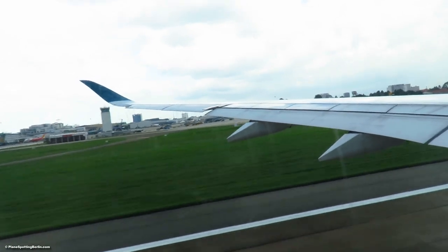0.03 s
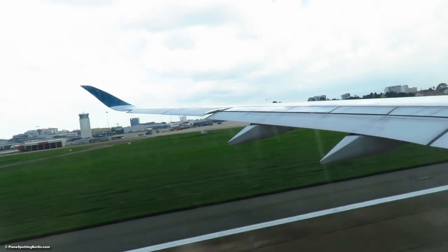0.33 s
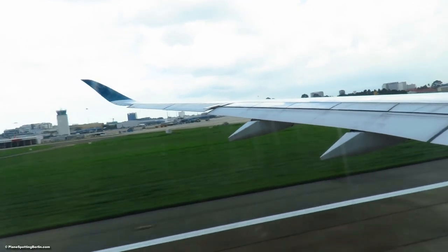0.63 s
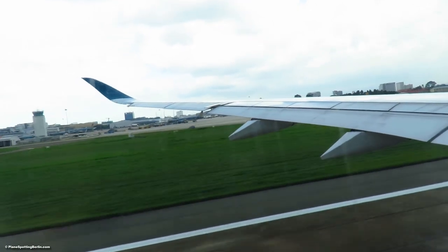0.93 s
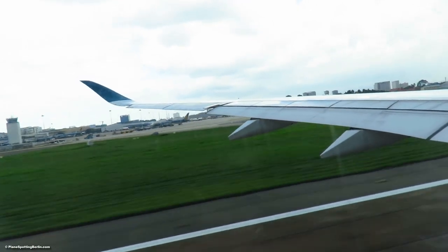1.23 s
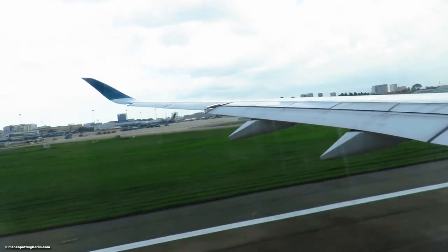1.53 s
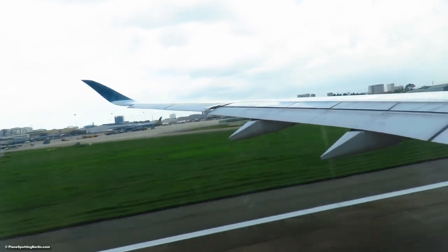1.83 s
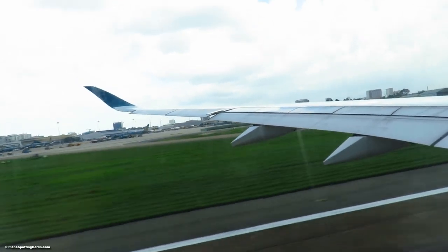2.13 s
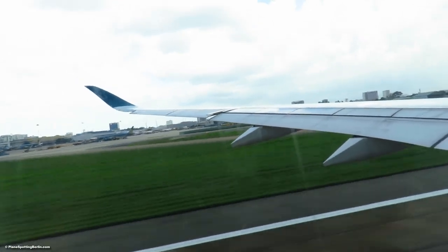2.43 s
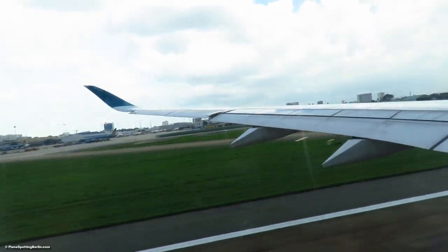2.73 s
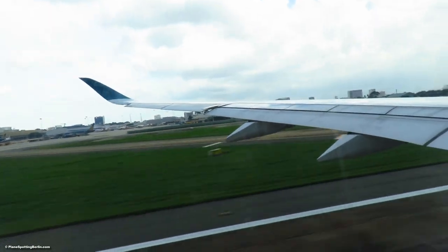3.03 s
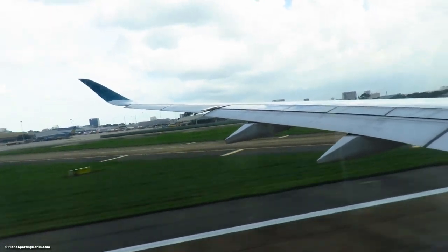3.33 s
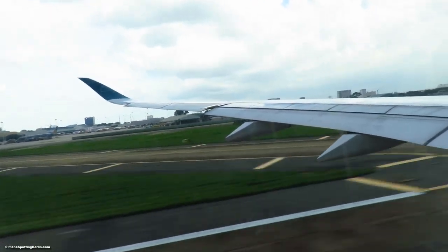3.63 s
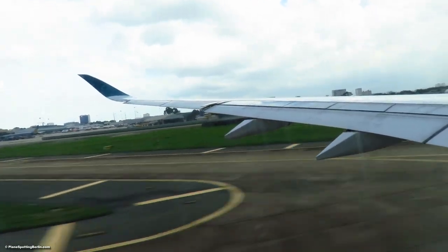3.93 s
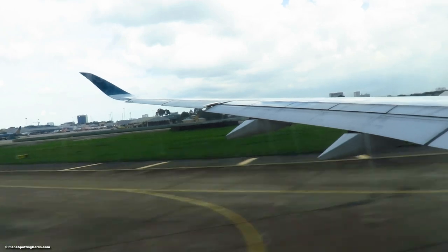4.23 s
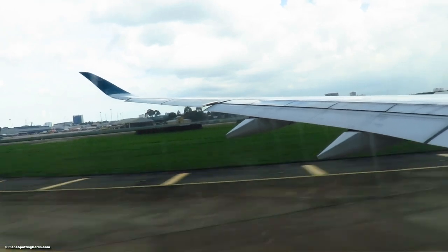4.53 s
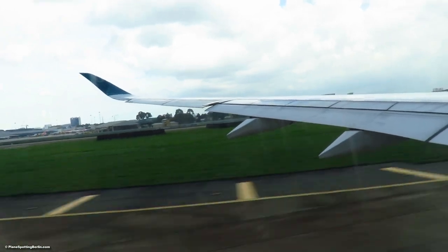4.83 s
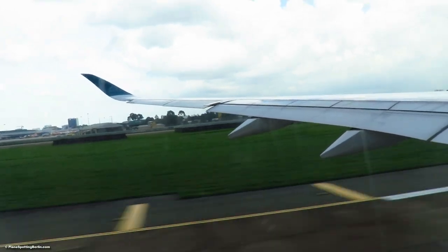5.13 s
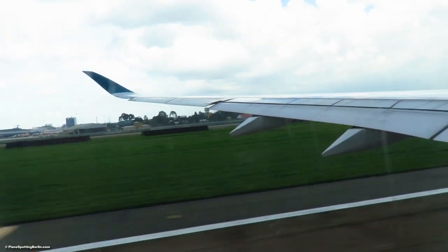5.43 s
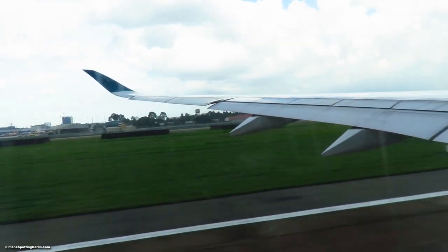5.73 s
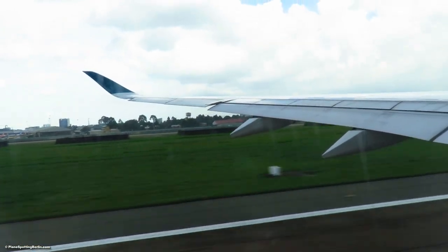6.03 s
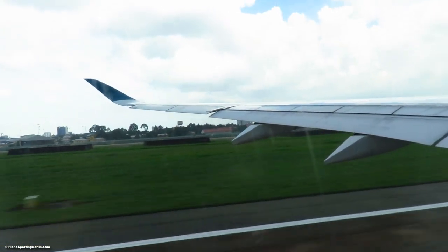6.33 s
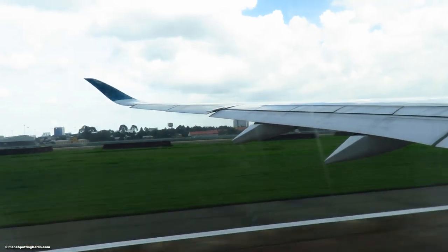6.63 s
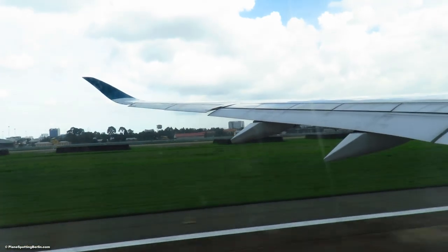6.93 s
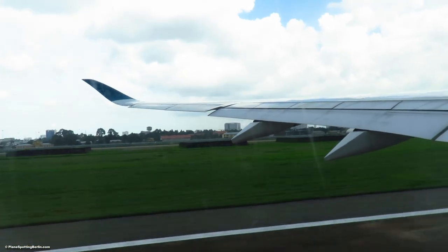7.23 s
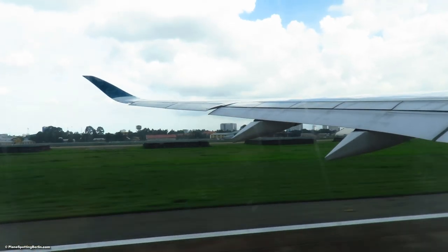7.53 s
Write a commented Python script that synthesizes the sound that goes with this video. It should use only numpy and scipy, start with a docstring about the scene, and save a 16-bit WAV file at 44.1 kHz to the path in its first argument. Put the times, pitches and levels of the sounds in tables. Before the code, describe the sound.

An airliner rolls fast along a runway, heard from inside the cabin by the wing. From start to finish, a deep wheel rumble and a muffled engine roar dominate at a steady level and pitch. A low cabin boom throbs within them, joined by a softer rush of air, faint fan tones and a very faint high fizz. Pavement bumps swell the rumble into dull thuds around 1.8, 2.3 and 3.3 seconds, more strongly at 4 and 4.8, then again at 5.6, 6.5 and 7.5. Faint tyre grinding rises slightly between 3.9 and 4.8 seconds. Interior trim chatters quietly throughout, with brief plastic rattles at the start, around 2 to 2.7 seconds, from 4.2 to 4.8, and near 6.7. A loose fitting gives a quick cluster of small, sharp clicks at about 5.3 seconds. The roar continues to the end, at about 7.6 seconds.

```python
"""Wheels rumble and engines roar: an airliner rolling fast along a runway, from a seat by the wing.
Tyre noise and turbulence come through the hull, swell over bumps and ring the cabin's low air modes.
The engine fans add faint tones. Rough pavement shakes the trim into chatter, plastic panels rattle,
and a loose fitting gives sharp little clicks. A faint treble fizz rides on the bass."""
import sys
import numpy as np
from scipy import signal
from scipy.fft import rfft, irfft
from scipy.io import wavfile
from scipy.ndimage import uniform_filter1d

SR = 44100
rng = np.random.default_rng(int(sys.argv[2]) if len(sys.argv) > 2 else 0)


def unload_wav(signal):
    """Save mono or channel-first audio to the path in sys.argv[1] as 16-bit WAV at rate SR, clipped to [-1, 1]."""
    wavfile.write(
        sys.argv[1],
        SR,
        np.round(np.clip(np.atleast_2d(signal).T, -1, 1) * 32767).astype(np.int16),
    )


N = 338688
TIME_S = np.arange(N) / SR
BINS_HZ = np.fft.rfftfreq(N, 1 / SR)
EASE_S = 0.03


def gain_of(db):
    """Decibels to amplitude."""
    return 10 ** (np.asarray(db) / 20)


def unit_rms(x):
    """Scales to rms 1."""
    return x / np.sqrt(np.mean(x ** 2) + 1e-20)


def steadied(x, span_s):
    """Holds the rms near 1 over span_s; faster flutter stays."""
    power = uniform_filter1d((x ** 2).mean(0), int(span_s * SR) + 1)
    return x / np.sqrt(uniform_filter1d(power, int(span_s * SR / 2) + 1) + 1e-20)


def spectrum(points):
    """Gain at every bin from (Hz, dB) points."""
    hz, db = np.transpose(points)
    return gain_of(np.interp(np.log(BINS_HZ + 1), np.log(hz + 1), db))


def curve(points):
    """Value at every sample from (s, value) points, corners rounded."""
    return uniform_filter1d(np.interp(TIME_S, *np.transpose(points)), int(EASE_S * SR))


def add(mix, start_s, sound):
    """Mixes a sound in at start_s."""
    part = mix[max(round(start_s * SR), 0):][:len(sound)]
    part += sound[:len(part)]


def noise():
    """Two independent white noises."""
    return rng.standard_normal((2, N))


def drift(rate_hz):
    """Random wander of rms 1, rolling off above rate_hz."""
    lowpass = np.exp(-(BINS_HZ / rate_hz) ** 2) * (BINS_HZ > 0)
    return unit_rms(irfft(rfft(rng.standard_normal(N)) * lowpass, N))


# Stereo width. Each row: frequency in Hz, side minus mid in dB.
SIDE_DB = [(25, -42.5), (70, -38), (130, -29.5), (200, -26), (380, -17.8), (700, -17.5), (1290, -12.8),
           (4400, -12.6), (8000, -9), (13000, -12)]
# Stereo balance. Each row: frequency in Hz, left minus right in dB.
LEAN_DB = [(90, 0), (200, 0.26), (380, 1.9), (700, -.2), (1290, -0.2), (2400, 0), (12000, 0.2)]


def diffuse(drive, colour):
    """Cabin sound field at rms 1: nearly mono in the bass, wider above."""
    mid, side = rfft(drive) * colour
    side = side * spectrum(SIDE_DB)
    lean = np.sqrt(spectrum(LEAN_DB))
    return unit_rms(irfft(np.array([(mid + side) * lean, (mid - side) / lean]), N))


def cabin_noise(points, span_s):
    """Steady diffuse noise coloured by (Hz, dB) points."""
    return steadied(diffuse(noise(), spectrum(points)), span_s)


# Pavement. Each row: time in seconds, roughness in dB about the usual.
ROUGHNESS_DB = [(0.04, 0.3), (0.22, -0.3), (0.33, 2), (0.72, -1.0), (1.16, -0.2), (1.22, -2.9), (1.78, 0.8),
                (1.94, 0.2), (2.28, 1.4), (2.34, -0.8), (3.34, 0.5), (3.44, -1.8), (3.85, -0.4),
                (3.96, 1.5), (4.24, 1.2), (4.36, -0.7), (4.68, 1), (4.77, 2.7), (4.86, -3.6), (4.94, 0.2),
                (7.6, -0.5)]


def ride_gain(level_db, follow, db_per_s, lift_db=0):
    """Gain that follows the pavement's roughness and slowly grows or fades along the run."""
    trend_db = db_per_s * (TIME_S - TIME_S.mean())
    return gain_of(level_db + follow * curve(ROUGHNESS_DB) + trend_db + lift_db)


# Each row: centre in seconds, length in seconds, rumble lift in dB, roar and rush lift in dB.
BUMPS = [(0.357, 0.031, 0, 2), (0.6, 0.074, 0, 3), (1.169, 0.013, 4, 5), (1.567, .03, 4, -5.5),
         (1.785, 0.039, 4.5, 1), (1.877, 0.028, 5, -3), (2.18, 0.18, 2, 1.5), (2.293, .06, 4, 0.5),
         (3.344, 0.045, 6, 0), (3.993, 0.057, 9, -0.5), (4.6, 0.1, 5, 1.5), (4.766, 0.053, 8.5, 0.5),
         (5.157, 0.025, 2, 4), (5.56, 0.16, 4.5, 3), (6.515, 0.038, 7, 3.5), (6.86, 0.25, 3.5, 1),
         (7.36, 0.25, 4.5, 2), (7.537, 0.053, 7.5, 2)]


def bump_lifts():
    """Each bump under the wheels is a bell in dB: one curve for the rumble, one for roar and rush."""
    centre_s, length_s, thud_db, knock_db = np.transpose(BUMPS)
    bells = np.exp(-(2 * (TIME_S[:, None] - centre_s) / length_s) ** 2)
    return bells @ thud_db, bells @ knock_db


# Each row: frequency in Hz, relative level in dB.
RUMBLE_SPECTRUM = [(10, -35.5), (21, -26), (29, -5), (37, -2), (46, -1.5), (55, -7), (65, 4.5), (76, -2.5),
                   (88, 4), (98, -0.5), (120, -1.5), (300, -83.5)]


def wheel_rumble(bump_db):
    """Deep noise of the wheels rolling over the pavement."""
    gain = ride_gain(level_db=-23.5, follow=0.6, db_per_s=-0.28, lift_db=bump_db)
    return gain * cabin_noise(RUMBLE_SPECTRUM, span_s=0.18)


# Each row: frequency in Hz, relative level in dB.
ROAR_SPECTRUM = [(60, -48), (110, -8), (150, 0), (170, -3), (204, -3.5), (225, -1.5), (246, -9.5),
                 (262, -4.5), (325, -9.5), (385, -11), (440, -16), (600, -40), (1500, -85)]


def engine_roar(bump_db):
    """Engine turbulence, muffled by the hull."""
    gain = ride_gain(level_db=-22.5, follow=1, db_per_s=0.19, lift_db=bump_db)
    return gain * cabin_noise(ROAR_SPECTRUM, span_s=0.3)


# Each row: frequency in Hz, relative level in dB.
RUSH_SPECTRUM = [(200, -20.5), (380, -14.5), (465, 2), (540, 1.5), (680, 1.5), (775, -3), (850, -1.5),
                 (920, -6), (1000, -7.5), (1250, -14.5), (1700, -24.5), (3000, -36.5), (8000, -80)]


def air_rush(bump_db):
    """Turbulent air, a midrange rush through the hull."""
    gain = ride_gain(level_db=-36.5, follow=1, db_per_s=-0.03, lift_db=bump_db)
    return gain * cabin_noise(RUSH_SPECTRUM, span_s=0.29)


# Each row: frequency in Hz, relative level in dB.
GRIND_SPECTRUM = [(600, -32), (950, 0.5), (1200, 4.5), (1450, -3), (1900, -19.5), (5000, -62.5)]


def tyre_grind(junction_s=(3.92, 4.79), lift_db=4):
    """Tyres grind on the pavement, louder across the concrete of a taxiway junction."""
    start_s, end_s = junction_s
    concrete_db = curve([(start_s - EASE_S, 0), (start_s, lift_db),
                         (end_s, lift_db), (end_s + EASE_S, 0)])
    gain = ride_gain(level_db=-54, follow=2.5, db_per_s=-0.51, lift_db=concrete_db)
    return gain * cabin_noise(GRIND_SPECTRUM, span_s=0.29)


# Each row: frequency in Hz, relative level in dB.
HISS_SPECTRUM = [(1000, -6.5), (3000, 20.5), (6000, -20), (8600, 1), (10000, -9.5), (12700, 11),
                 (13300, -24), (13900, -27.5), (16000, -52)]


def hiss(level_db=-75.5):
    """Faint, steady treble noise."""
    return gain_of(level_db) * diffuse(noise(), spectrum(HISS_SPECTRUM))


# Low, middle and high air mode. Each row: bandwidth in Hz, level offset in dB.
CABIN_MODES = [(7, 0), (4.5, 1.5), (7, 0.8)]
# Mode pitches. Each row: time in seconds, frequency in Hz.
LOW_MODE_HZ = [(0, 121.5), (.6, 123.3), (.95, 122), (1.2, 124), (1.7, 121), (2.05, 126), (2.7, 124.5),
               (3.05, 127.5), (3.6, 124), (4.15, 127.5), (4.7, 123.5), (5.03, 127.5), (5.7, 121),
               (6.3, 122), (6.55, 128), (6.8, 119), (7.15, 122), (7.6, 118)]
MIDDLE_MODE_HZ = [(.15, 185.5), (.4, 188.5), (1.85, 189), (2.25, 186.3), (3.1, 188.5), (3.45, 184),
                  (4.3, 186), (4.47, 189), (4.68, 184.5), (4.9, 188), (5.08, 184.5), (5.5, 187.3),
                  (5.68, 191), (6.15, 185.5), (7, 183.5), (7.6, 186)]
HIGH_MODE_HZ = [(.2, 238), (.5, 242), (1.05, 237), (1.25, 243), (1.85, 239), (2.25, 245), (3, 238.5),
                (3.6, 244.5), (4.7, 240), (5.2, 234.5), (5.65, 237), (5.9, 244), (6.6, 246), (6.85, 235.5),
                (7.15, 242), (7.42, 237)]
# Mode swells. Each row: time in seconds, level in dB before the offset.
LOW_MODE_DB = [(0.04, -24), (0.3, -19.5), (0.54, -27), (0.62, -18), (0.84, -25.5), (1.22, -19), (1.28, -43),
               (1.44, -15), (1.52, -39), (1.64, -19), (1.86, -33), (1.98, -19), (2.34, -29), (2.5, -38),
               (2.56, -21), (2.64, -18.5), (2.76, -44), (2.84, -22.5), (3.159, -15), (3.26, -38),
               (3.54, -17.5), (3.64, -33), (3.8, -22), (3.86, -39), (3.96, -25), (4.22, -23), (4.52, -45),
               (4.56, -28), (5.04, -20), (5.4, -33.5), (5.82, -16), (5.92, -39), (6.04, -20.5),
               (6.14, -29.5), (6.28, -19.5), (6.38, -34), (6.54, -20.0), (6.64, -26.5), (6.96, -21),
               (7.34, -23), (7.46, -17.5), (7.62, -33)]
MIDDLE_MODE_DB = [(0.04, -25.5), (0.28, -23.5), (0.7, -39.5), (0.88, -27.5), (0.98, -33), (1.18, -29.5),
                  (1.62, -41.5), (1.9, -24), (2.12, -36.5), (2.26, -21), (2.36, -36.5), (2.56, -24.5),
                  (3.06, -36), (3.14, -24.5), (3.24, -52), (3.36, -21.5), (3.58, -38), (3.62, -30),
                  (4.12, -28.5), (4.22, -29.5), (4.321, -22.5), (5.26, -29.5), (5.38, -22.5), (5.54, -26),
                  (5.6, -44), (5.66, -20.5), (5.86, -32), (6.16, -20.5), (6.24, -32), (6.54, -25.5),
                  (6.88, -37.5), (6.96, -26), (7.28, -29.5), (7.38, -38), (7.46, -25.5), (7.62, -38)]
HIGH_MODE_DB = [(0.04, -28), (0.1, -26), (0.3, -46), (0.34, -25), (1.04, -37), (1.12, -21), (1.36, -34),
                (1.82, -27), (1.96, -34), (2.16, -37), (2.38, -26), (2.8, -34), (3.38, -25), (3.46, -37.5),
                (4.12, -29.5), (4.42, -37.5), (4.74, -25), (4.82, -42.5), (5.18, -23), (5.24, -42.5),
                (5.66, -25.5), (5.76, -34.5), (6.16, -26), (6.58, -29.5), (6.88, -23), (7.04, -37.5),
                (7.38, -24), (7.62, -36.5)]


def cabin_boom():
    """The cabin's air modes ring as narrow noise bands that throb and wander in pitch."""
    pitches = [LOW_MODE_HZ, MIDDLE_MODE_HZ, HIGH_MODE_HZ]
    swells = [LOW_MODE_DB, MIDDLE_MODE_DB, HIGH_MODE_DB]
    out = np.zeros((2, N))
    for (width_hz, offset_db), pitch, swell in zip(CABIN_MODES, pitches, swells):
        narrow = 1 / (1 + (BINS_HZ / width_hz * 1.28) ** 2)
        phase = 2 * np.pi * np.cumsum(curve(pitch)) / SR
        # Slow noise, shifted up to the mode's pitch.
        drive = sum(irfft(rfft(noise()) * narrow, N) * wave(phase) for wave in (np.cos, np.sin))
        ringing = steadied(diffuse(drive, colour=1), span_s=0.06)
        out += gain_of(offset_db + curve(swell)) * ringing
    return out


# Each row: multiple of the shaft speed, rms level in dB.
SHAFT_ORDERS = [(8, -42.5), (9, -41.5), (11, -51)]
# Blade-passing tone. Each row: time in seconds, rms level in dB.
BLADE_TONE_DB = [(0.04, -45), (0.24, -53), (0.39, -41.5), (0.55, -48), (0.92, -54), (1.6, -51.5),
                 (1.82, -46.5), (2.0, -54.5), (3.3, -48.5), (3.44, -56), (3.88, -48.5), (4.08, -43),
                 (4.28, -50.5), (4.74, -43), (4.9, -57), (5.95, -59), (6.1, -41.5), (6.3, -56), (7.6, -61)]


def engine_fan(shaft_hz=37.68, blades=22, waver=0.0007, flutter_db=2.5, blade_flutter_db=1.5):
    """At steady thrust, shaft orders flutter in the uneven inflow; the blades add a rough tone."""
    turns = np.cumsum(shaft_hz * (1 + waver * drift(rate_hz=1.9))) / SR
    tones = np.zeros(N)
    for order, level_db in SHAFT_ORDERS:
        gain = gain_of(level_db + flutter_db * drift(rate_hz=3.5))
        tones += gain * np.sin(2 * np.pi * (order * turns + rng.random()))
    passes = blades * turns + 0.11 * drift(rate_hz=14)  # phase noise roughens the tone
    blade_gain = gain_of(curve(BLADE_TONE_DB) + blade_flutter_db * drift(rate_hz=14))
    return np.sqrt(2) * (tones + blade_gain * np.sin(2 * np.pi * passes))


# Each row: frequency in Hz, bandwidth in Hz, relative level in dB.
PANEL_MODES = [(1850, 170, 0), (2400, 220, 0), (3030, 150, 2), (3700, 160, -4), (4300, 200, -2),
               (5270, 170, 1), (6450, 220, -2)]


def panel_response(ring_db):
    """Gain of a trim panel at every bin: the direct contact plus its ringing modes."""
    return 1 + sum(gain_of(mode_db + ring_db) / (1 + 2j * (BINS_HZ - hz) / width_hz)
                   for hz, width_hz, mode_db in PANEL_MODES)


# Each row: frequency in Hz, relative level in dB.
CHATTER_SPECTRUM = [(600, -24.5), (1200, -12), (1550, 6.5), (1850, 0), (2500, 0), (2900, -4), (3500, -6.5),
                    (3880, -10), (4300, -10), (4700, -10.5), (5800, -16.5), (7500, -18), (10000, -21.5),
                    (13000, -19), (14500, -71)]


def trim_chatter(contacts_per_s=750, spread_db=3.4, tick_s=0.00057, tick_share=0.36, flicker_db=1.2):
    """Countless tiny contacts between shaken panels, each a brief burst, over a smooth wash."""
    strength = gain_of(spread_db * np.minimum(rng.exponential(1, N), 4))
    contacts = strength * (rng.random(N) < contacts_per_s / SR)
    energy = signal.lfilter([1], [1, -np.exp(-1 / (tick_s * SR))], contacts ** 2)
    envelope = np.sqrt(1 - tick_share + tick_share * energy / energy.mean())
    drive = noise() * envelope * gain_of(flicker_db * drift(rate_hz=20))
    chatter = diffuse(drive, spectrum(CHATTER_SPECTRUM) * panel_response(ring_db=-14))
    return ride_gain(level_db=-53.5, follow=1, db_per_s=-0.2) * steadied(chatter, span_s=0.69)


# Each row: start in seconds, rasp level in dB, length in seconds, ring pitch in Hz, ring level in dB.
RATTLES = [(.031, -44.5, .014, 1850, -54), (.035, -57, .008, 5320, -59.5), (.282, -55, .025, 2200, -62),
           (.312, -48.8, .05, 2700, -63), (.47, -57, .03, 2700, -63), (.903, -50, .02, 4700, -64),
           (1.079, -51.5, .016, 2400, -61), (1.741, -50.5, .02, 3050, -61), (1.757, -60, .018, 6250, -63.5),
           (2.011, -53, .008, 1900, -59), (2.083, -45, .025, 2450, -54.5), (2.085, -56, .008, 4400, -57),
           (2.135, -51.5, .04, 3200, -63), (2.22, -55, .025, 4300, -66), (2.255, -46, .027, 1900, -51.5),
           (2.688, -48, .018, 2100, -56), (3.3, -55.5, .035, 2600, -65), (3.542, -54, .012, 5250, -63.5),
           (4.184, -49, .016, 2200, -55), (4.648, -51, .012, 5300, -61), (4.685, -55, .03, 2450, -61),
           (4.731, -50.5, .016, 3400, -57), (4.756, -48, .022, 3700, -63), (6.3, -53, .009, 4850, -56.5),
           (6.71, -58, .03, 2400, -61), (6.755, -54, .035, 2400, -56), (7.205, -56, .014, 3450, -53.5)]
# Each row: frequency in Hz, relative level in dB.
RASP_SPECTRUM = [(700, -32), (1500, -4), (2200, -1.5), (3500, -8.5), (5000, -12), (6500, -22.5),
                 (12000, -31), (14500, -57)]


def panel_rattles(rise_s=0.002, grain_db=2.5, ring_t60_s=0.07, buzz_turns=0.15):
    """A plastic panel buzzes against its neighbour: a short rasp, and a ring that outlasts it."""
    t, out = np.arange(SR // 5) / SR, np.zeros((2, N))
    grains = noise() * gain_of(grain_db * drift(rate_hz=430))
    rasp = diffuse(grains, spectrum(RASP_SPECTRUM) * panel_response(ring_db=-2.5))
    buzz = buzz_turns * drift(rate_hz=140)
    attack = 1 - np.exp(-t / rise_s)
    for start_s, rasp_db, length_s, ring_hz, ring_db in RATTLES:
        first = round(start_s * SR)
        span = slice(first, first + len(t))
        burst = rasp[:, span] * gain_of(rasp_db) * np.exp(-(t / length_s) ** 2)
        decay_db = 60 * np.maximum(t - length_s / 2, 0) / ring_t60_s
        ring = np.sqrt(2) * gain_of(ring_db - decay_db) * np.sin(2 * np.pi * (ring_hz * t + buzz[span]))
        for channel, sound in zip(out, attack * (burst + ring)):
            add(channel, start_s, sound)
    return out


# Each row: start in seconds, level in dB.
CLICKS = [(1.757, -64), (5.147, -62), (5.261, -64), (5.281, -48.3), (5.286, -53.5), (5.293, -60),
          (5.303, -61), (5.43, -65), (6.303, -63)]
# Each row: frequency in Hz, relative level in dB, T60 in seconds.
FITTING_MODES = [(2410, -4, .04), (3715, -5, .04), (4440, -7, .03), (6400, -5, .07), (6750, -3, .025),
                 (8500, -3, .028), (9100, -6, .02), (9700, -8, .022), (10370, -5, .03), (11900, -10, .02),
                 (12510, -11.5, .022)]


def fitting_clicks(snap_db=4, snap_s=0.0025, cabin_db=-7, cabin_t60_s=0.14):
    """A loose hard fitting snaps and rings at each tap; nearby seats and panels scatter the sound."""
    t, direct = np.arange(SR // 5) / SR, np.zeros(N)
    snap_band = signal.butter(4, [4500, 12500], "bandpass", fs=SR, output="sos")
    for start_s, level_db in CLICKS:
        ring = sum(gain_of(mode_db - 60 * t / t60_s) * np.sin(2 * np.pi * (hz * t + rng.random()))
                   for hz, mode_db, t60_s in FITTING_MODES)
        snap = signal.sosfilt(snap_band, rng.standard_normal(len(t)) * np.exp(-t / snap_s))
        add(direct, start_s, gain_of(level_db) * (ring + gain_of(snap_db) * snap))
    tail = rng.standard_normal((2, len(t))) * gain_of(-60 * t / cabin_t60_s)
    scattered = signal.fftconvolve(direct[None], tail / np.linalg.norm(tail[0]), axes=1)[:, :N]
    return direct + gain_of(cabin_db) * scattered


def scene():
    """Wheels, engines, cabin and trim, summed in stereo."""
    thud_db, knock_db = bump_lifts()
    ride = wheel_rumble(thud_db) + engine_roar(knock_db) + air_rush(knock_db) + tyre_grind()
    drone = hiss() + cabin_boom() + engine_fan()
    return ride + drone + trim_chatter() + panel_rattles() + fitting_clicks()


# Periodic timing jitter. Each row: rate in Hz, swing in microseconds.
JITTER = [(3890.6, 6.8), (7781.2, 2.95), (11718.8, 1.8), (15609.4, 1.0)]


def treble_fizz(dry, wander_turns=0.06):
    """Timing jitter turns the slope of the loud bass into faint bands of fizz."""
    shift_s = np.zeros(N)
    for hz, swing_us in JITTER:
        turns = hz * TIME_S + rng.random() + wander_turns * drift(rate_hz=110)
        shift_s += swing_us * 1e-6 * np.cos(2 * np.pi * turns)
    bass = signal.sosfilt(signal.butter(4, 1500, fs=SR, output="sos"), dry)
    return shift_s * np.gradient(bass, axis=1) * SR


def record(dry, cutoff_hz=15550):
    """Adds the fizz, fades both ends and cuts the top treble."""
    faded = (dry + treble_fizz(dry)) * signal.windows.tukey(N, 0.001)
    lowpass = signal.firwin(511, cutoff_hz, window=("kaiser", 9), fs=SR)
    return signal.oaconvolve(faded, lowpass[None], "same")


dry = scene()
out = record(dry)
unload_wav(out)
```